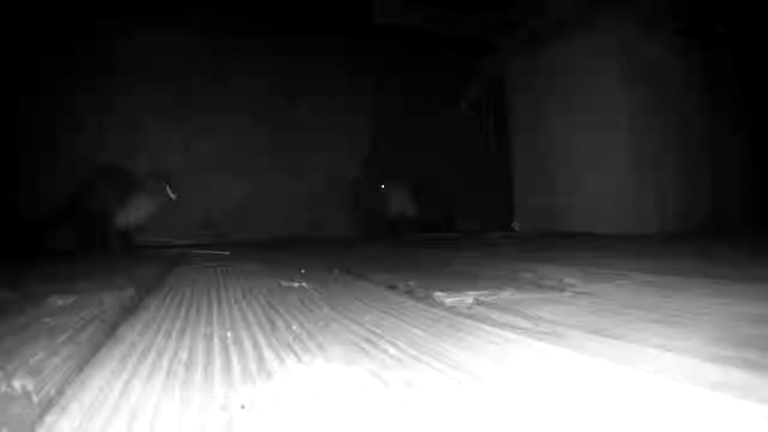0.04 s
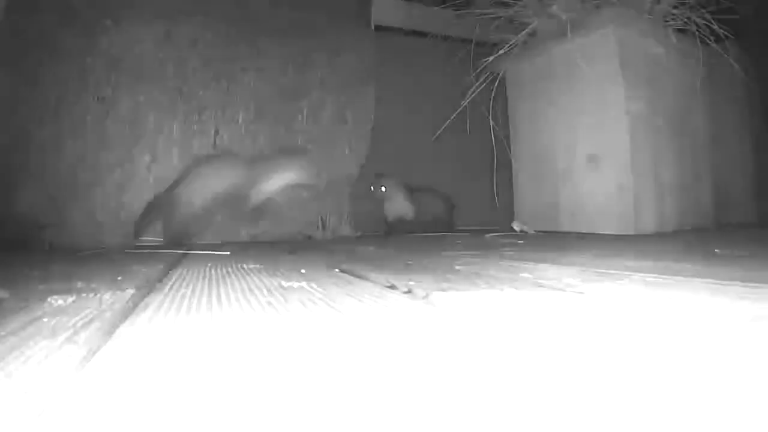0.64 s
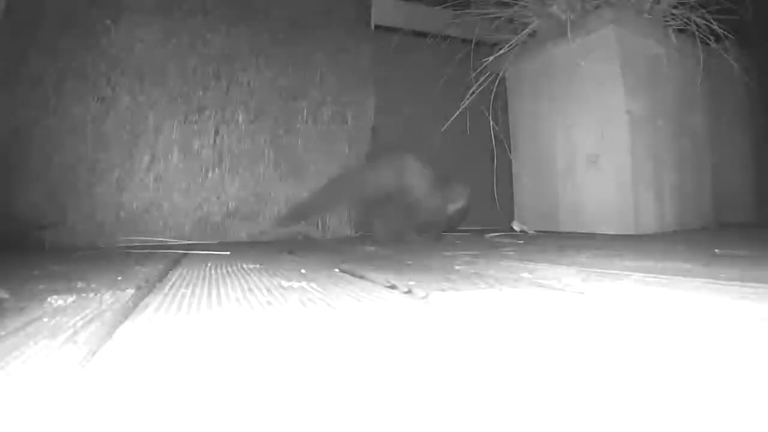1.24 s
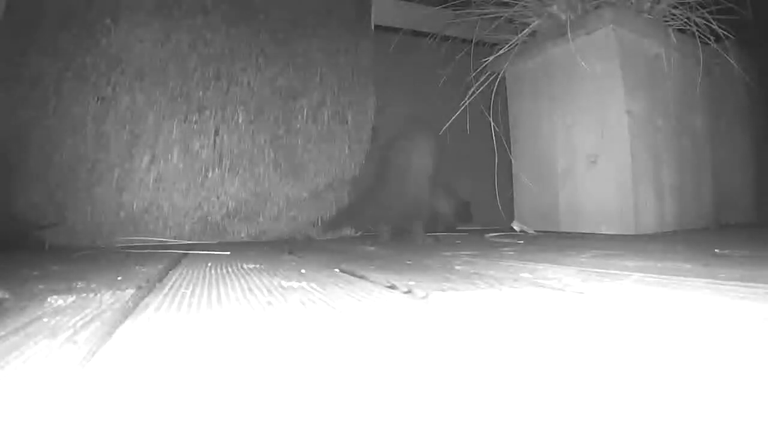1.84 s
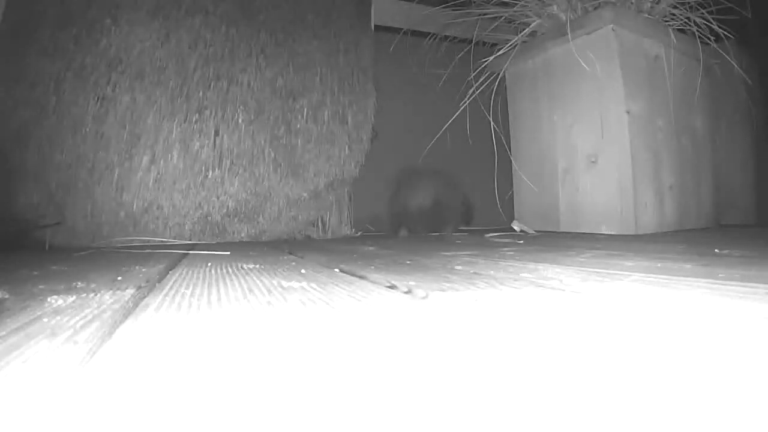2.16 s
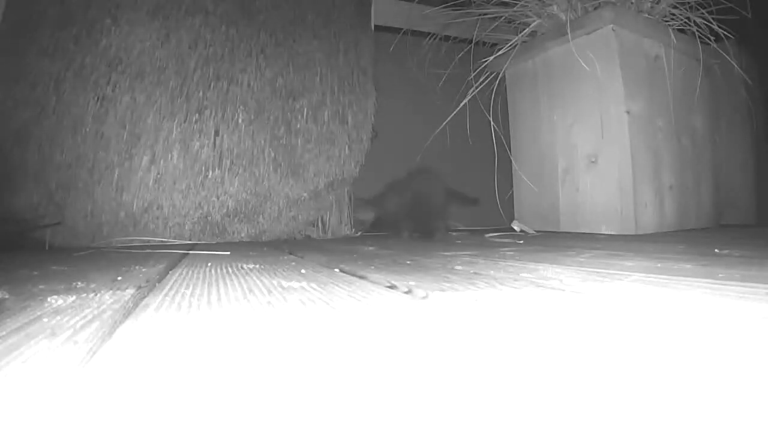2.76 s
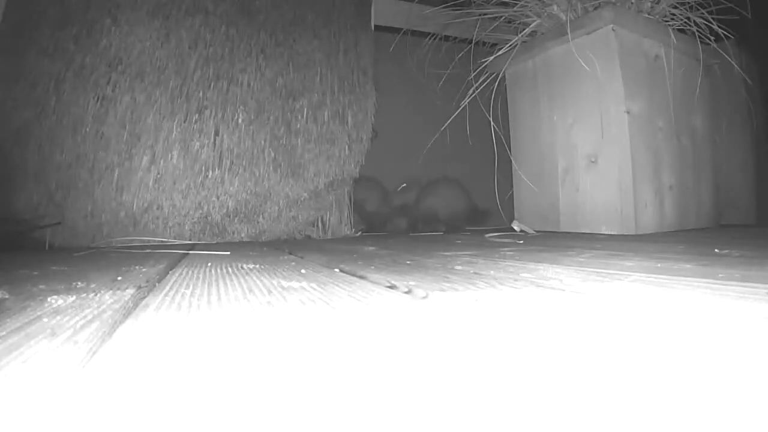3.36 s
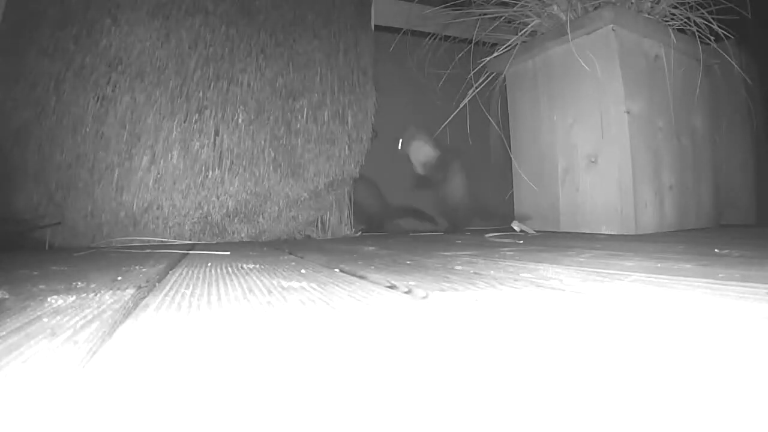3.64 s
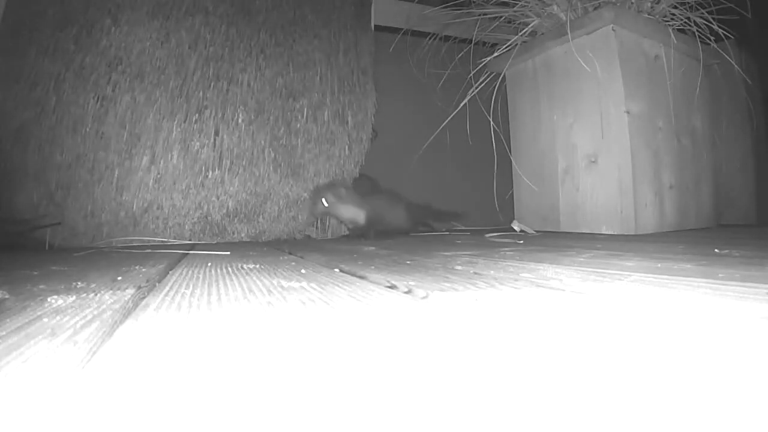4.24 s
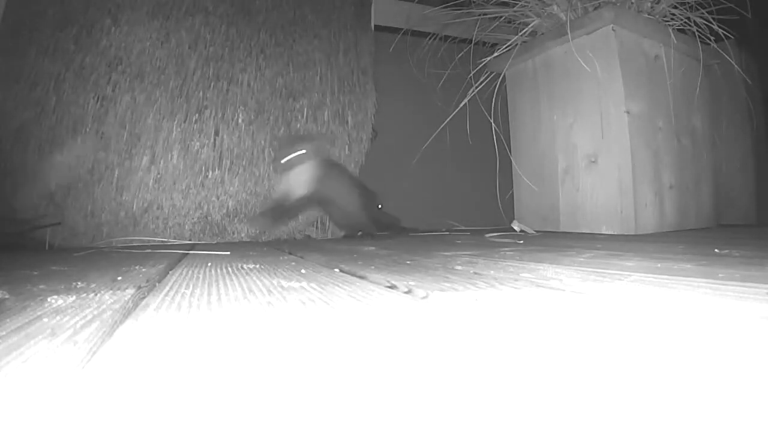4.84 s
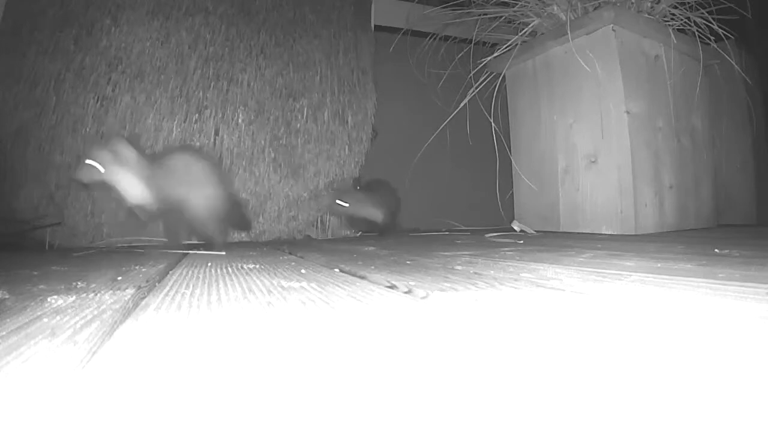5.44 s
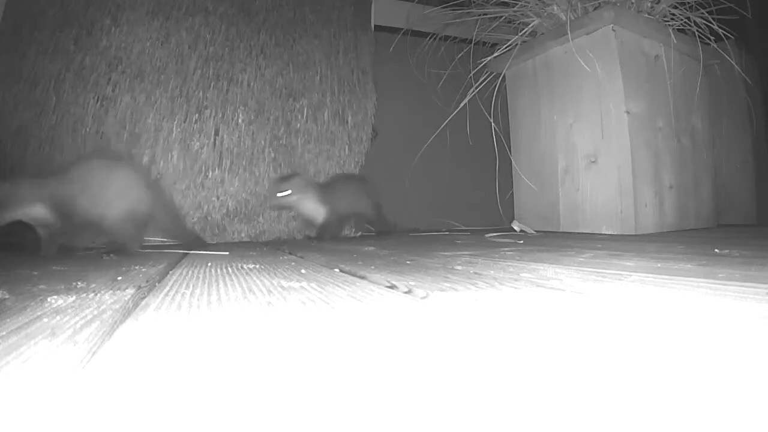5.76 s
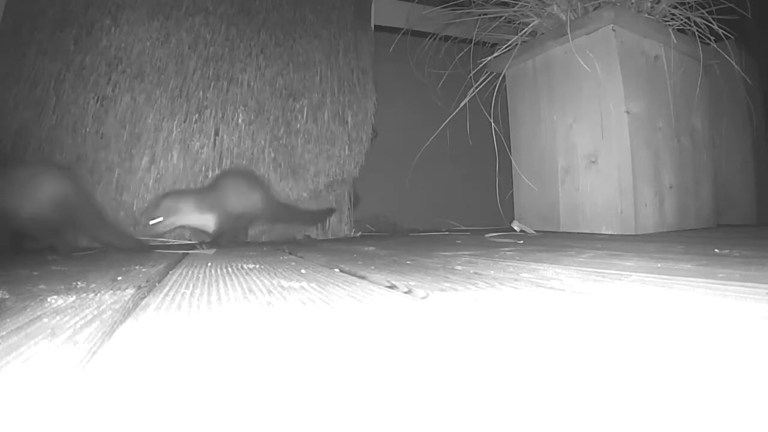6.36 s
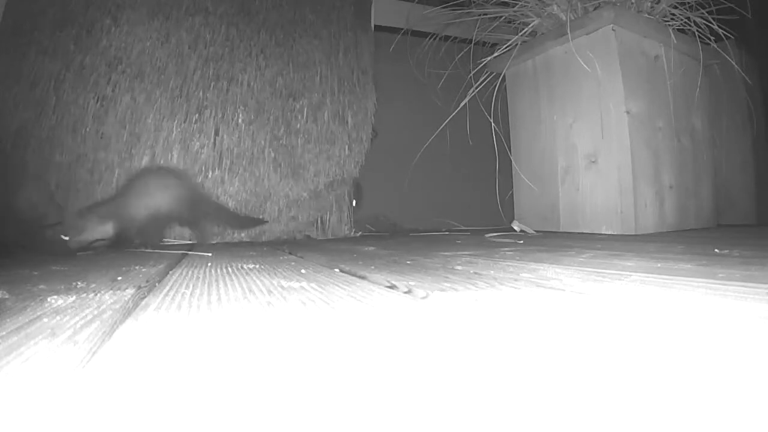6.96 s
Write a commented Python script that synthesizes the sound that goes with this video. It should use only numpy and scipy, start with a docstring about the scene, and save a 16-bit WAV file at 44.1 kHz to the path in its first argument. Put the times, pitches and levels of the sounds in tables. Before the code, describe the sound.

Small animals scamper and tussle on wooden floorboards in a shed, with irregular paw thuds, claw clicks and light rustling over faint hum and hiss.

```python
"""Inside a shed, a small camera standing on the plank floor. Its microphone wakes with a soft pop, on a
faint hum and hiss. At half a second a marten leaps in and bounds across: pads thud, heels knock, claws
click and scrape on the wood. From 2 s two martens tussle in the corner; fur and straw rustle between the
steps, and heavy landings set the joists swaying. From 5 s they run out past the camera, one by one."""
import sys
import numpy as np
from scipy import signal
from scipy.fft import rfft, irfft
from scipy.io import wavfile
from scipy.ndimage import uniform_filter1d

SR = 44100
rng = np.random.default_rng(int(sys.argv[2]) if len(sys.argv) > 2 else 0)


def dump(signal):
    """Clip the signal to [-1, 1] and save it as 16-bit WAV at the path in sys.argv[1]."""
    limited = np.clip(np.atleast_2d(signal).T, -1, 1)
    pcm = np.round(limited * 32767).astype(np.int16)
    wavfile.write(sys.argv[1], SR, pcm)


N = 317520
RING_TIME = np.arange(SR // 3) / SR  # time axis of one impact [s]

# steps with the body's weight on them; levels before the board and the spot hit shape them:
# (time [s], pad thud [dB], heel knock [dB], claw click [dB], slide [s], tone of the spot hit [Hz])
FOOTFALLS = [ (.559, -35, -27.5, -24, 0.00034, 420), (.594, -36, -36, -38.5, 0.00036, 790),
             (.649, -44.5, -33, -31.5, 0.0006, 1000), (.676, -48, -42, -48.5, 0.005, 817),
             (0.852, -44.5, -57, -68, 0.0036, 790), (.882, -52.5, -55.5, -58.5, 0.0008, 830),
             (1.049, -38.5, -42, -53.5, 0.0053, 790), (1.164, -51, -58, -68, 0.0033, 790),
             (1.201, -51.5, -58, -64, 0.0018, 750), (1.375, -45, -46.5, -58.5, 0.0024, 796),
             (1.446, -50, -50, -62, .001, 790), (1.828, -48, -56, -63, .0009, 800),
             (2.125, -39, -40, -50, .0019, 1172), (2.224, -39.5, -40, -55.5, 0.00081, 784),
             (2.38, -32, -47.5, -53.5, .0007, 680), (2.445, -53, -51, -55, 0.0011, 1160),
             (2.53, -49.5, -57, -62, .007, 790), (2.598, -60, -55, -64.5, 0.0017, 756),
             (2.685, -40, -58, -61, 0.0024, 990), (2.765, -39.5, -55.5, -58, 0.015, 830),
             (2.794, -44, -57.5, -46.5, 0.0013, 2190), (2.887, -57, -54, -54.5, 0.0015, 790),
             (2.942, -35.5, -58.5, -61.5, 0.0047, 790), (3.121, -42, -61, -64, 0.033, 2060),
             (3.163, -45.5, -59, -51.5, 0.0095, 3670), (3.319, -53.5, -58, -60, 0.0035, 1330),
             (3.48, -50, -58, -60, .02, 3460), (3.702, -49, -65.5, -68, 0.023, 2060),
             (3.769, -48, -67, -70, .016, 3500), (3.922, -44.5, -68, -56.5, 0.0043, 3440),
             (3.962, -44, -48.5, -60.5, 0.032, 836), (4.192, -40.5, -49, -49.5, 0.0032, 1045),
             (4.213, -45.5, -41.5, -56, .004, 755), (4.556, -51, -52.5, -52, 0.0031, 725),
             (4.786, -49, -52.5, -64, 0.0031, 620), (4.977, -51.5, -63.5, -64, 0.0039, 3400),
             (5.007, -51.5, -41.5, -38, 0.0012, 1890), (5.049, -49, -51.5, -44.5, 0.0014, 3600),
             (5.162, -50, -41, -41, .0021, 890), (5.242, -51, -49.5, -48.5, .002, 880),
             (5.292, -43, -44.5, -46.5, 0.001, 790), (5.335, -43.5, -45, -59, .0012, 790),
             (5.415, -37.5, -54.5, -50.5, 0.00061, 1990), (5.475, -48, -51, -49.5, 0.0016, 3200),
             (5.506, -40, -53.5, -48.5, 0.0058, 1560), (5.549, -49, -47.5, -50, 0.0021, 2210),
             (5.557, -58, -43.5, -44.5, 0.00034, 790), (5.607, -39.5, -47, -59.5, 0.013, 750),
             (5.661, -46.5, -50, -60, 0.0027, 790), (5.802, -43, -45.5, -52, .0009, 747),
             (5.833, -43, -55, -55.5, 0.0035, 790), (5.881, -46.5, -51.5, -55.5, 0.0038, 790),
             (6.037, -46.5, -47, -51, 0.002, 700), (6.329, -52.5, -59, -61.5, 0.0034, 854),
             (6.406, -52, -50.5, -48.5, 0.0024, 890), (6.436, -48.5, -74, -59, 0.0028, 850),
             (6.503, -55, -67, -52.5, 0.00058, 3280), (6.621, -53, -51.5, -69, 0.0076, 790),
             (7.071, -59.5, -50.5, -59, 0.0044, 990), (7.14, -64, -57.5, -62.5, 0.0078, 750)]
# claws raking the boards with no weight on them: (time [s], level [dB], slide [s])
SCRABBLES = [(.465, -56, 0.0015), (.748, -45, 0.00067), (.775, -49, 0.001), (.795, -50, .0046),
             (2.856, -49.5, 0.0048), (3.859, -49, 0.0078), (4.015, -55, 0.0039), (4.42, -57.5, 0.012),
             (4.878, -51.5, 0.0027), (5.228, -46, 0.0056), (5.45, -55, 0.003), (5.735, -58, 0.006),
             (6.544, -66.5, 0.014), (6.678, -52, 0.0028), (6.695, -56, .005), (6.946, -58, 0.0024),
             (6.975, -63, 0.014), (7.07, -46.5, 0.0022), (7.16, -62, .018)]
# boards along the animals' path; near a joist a plank bends less and clunks more:
# (time [s], stiffness [dB], plank pitch [Hz])
BOARDS_ON_PATH = [(.65, 2.5, 197.2), (.95, 5.5, 172.4), (2.2, -5, 194), (2.4, -6.5, 177.7), (3, 4.5, 181.9),
                  (3.7, 2, 184.4), (4.3, 6, 181.5), (5.35, 4, 188.4), (5.9, 8.5, 184.3), (6.6, 3, 184)]
# a plank bending under a pad: (multiple of its pitch [ratio], relative level [dB], base t60 [s])
PLANK_MODES = [(0.639, -12.5, 0.13), (0.799, -7.5, 0.16), (0.998, 2.5, 0.18), (1.131, -19.5, 0.57),
               (1.501, -23, 0.11)]
# higher modes of the floor: (frequency [Hz], relative level [dB], base t60 [s])
WOOD_MODES = [(362, -1, 0.042), (407.6, -4, 0.069), (525, -0.5, 0.074), (759.8, 3, 0.14), (799, -10, 0.26),
              (890, -0.5, 0.14), (1039, -5.5, 0.12), (1204.5, -4.5, 0.1), (1358, -1, 0.043),
              (1466, -17, 0.1), (1731, -6, 0.068), (2079, -0.5, 0.043), (2220, -2.5, 0.024),
              (2436, 0.5, 0.022), (2975, -3, 0.027), (3420, -19, 0.022)]
# decay of the floor's dense small modes, its grain: (frequency [Hz], t60 [s])
GRAIN_DECAY = [(200, 0.18), (900, .11), (1800, 0.039), (3500, 0.032)]
# that grain under a pad, a heel, a claw tip and a sliding claw: (frequency [Hz], relative level [dB])
PAD_SPECTRUM = [(150, -23.5), (310, 3), (430, 2), (560, -4.5), (750, -30)]
KNOCK_SPECTRUM = [(300, -27), (600, -17.5), (850, -5), (1300, -7.5), (1600, -36), (3000, -66.5)]
CLICK_SPECTRUM = [(700, -29.5), (1300, -4.5), (1900, 9), (2600, 6.5), (3600, 9), (4200, -41), (5300, -38)]
SCRATCH_SPECTRUM = [(1000, -17.5), (2000, -17), (3500, 5), (4300, 6), (5300, 0.5)]
# landings that shake the whole floor: (time [s], level [dB])
LANDINGS = [(0.647, -54), (1.061, -52), (2.125, -45), (2.764, -50.5), (3.582, -58), (4.012, -50.5),
            (4.22, -40.5), (5.1, -51), (5.452, -51), (5.841, -47.5), (6.079, -49), (6.448, -47),
            (7.119, -53)]
# how hard the bodies brush about: (time [s], relative level [dB])
BRUSHING = [(.55, -77), (.63, -58), (.92, -76.5), (1.62, -84), (2.101, -79.5), (2.35, -66.5), (2.6, -76),
            (2.98, -65), (3.251, -66), (3.95, -60.5), (4.3, -70), (4.852, -67), (5.35, -59), (5.8, -66.5),
            (5.979, -74.5), (6.498, -74.5), (6.95, -73.5), (7.19, -66.5)]
# fur and straw: (frequency [Hz], relative level [dB])
RUSTLE_SPECTRUM = [(200, -17), (500, 5), (1400, -1), (2100, 2), (3900, 4), (5300, 2.5)]
# the boards under light shuffling steps: (frequency [Hz], relative level [dB], t60 [s])
SHUFFLE_MODES = [(64.2, 0.5, .3), (146, 3, 0.068), (168, 1.5, 0.23), (204.8, 1, 0.34), (316.6, -6, 0.2),
                 (420, -10.5, 0.19), (790, -21.5, 0.07)]
# still air and the camera's electronics: (frequency [Hz], relative level [dB])
HISS_SPECTRUM = [(20, -13.5), (50, 11.5), (80, -8), (150, -6), (300, -10), (600, -13), (830, -10.5),
                 (1300, -15.5), (3000, -19), (5300, -22.5)]
# steady tones of the hum: (frequency [Hz], level [dB])
HUM_TONES = [(100, -72.5), (150.5, -82), (818, -78)]


def footfalls(pad_db=-10):
    """Paws on the floor the camera stands on: the pad thuds and puffs, the heel knocks, claws strike."""
    out = np.zeros(N)
    for time_s, thud_db, knock_db, click_db, slide_s, spot_hz in FOOTFALLS:
        grain = floor_grain(slide_s)
        stiff_db, plank_hz = board_at(time_s)
        add(out, time_s, amp(thud_db) * pad_thud(scattered(plank_hz, share=0.012), stiff_db, slide_s))
        puff_db = (thud_db + knock_db) / 2 + pad_db + stiff_db
        add(out, time_s, amp(puff_db) * crest(colour(grain, PAD_SPECTRUM)))
        add(out, time_s, heel_knock(grain, knock_db, stiff_db, spot_hz))
        scratch_db = scratch_balance(knock_db, click_db, slide_s)
        add(out, time_s, claw_strike(grain, click_db, scratch_db, slide_s, spot_hz))
    return out


def pad_thud(plank_hz, stiff_db, slide_s):
    """The soft pad bends the plank; a sliding paw loads it more slowly, a stiff board stops sooner."""
    modes = [(ratio * plank_hz, db, t60 * amp(-0.45 * stiff_db)) for ratio, db, t60 in PLANK_MODES]
    return amp(-0.15 * stiff_db) * crest(ring(modes, rise_s=0.0019 + 0.08 * slide_s, spread_db=6))


def heel_knock(grain, knock_db, stiff_db, spot_hz):
    """The heel rings the middle modes of the wood; a harder blow brings out those near 414 Hz."""
    modes = [(hz, db, t60 * amp(-0.3 * stiff_db - 0.5)) for hz, db, t60 in WOOD_MODES if hz < 1400]
    heel = crest(ring(modes, rise_s=0.0021, spread_db=5.5))
    heel += 0.66 * crest(colour(grain, KNOCK_SPECTRUM))
    heel = resonate(heel, 414, boost_db=0.6 * (knock_db + 19), q=8.9)
    heel = resonate(heel, spot_hz, boost_db=11.5, q=17.3)
    return amp(knock_db) * crest(heel)


def claw_strike(grain, click_db, scratch_db, slide_s, spot_hz):
    """The claws click on the high modes of the wood and scratch as they slide."""
    force = claw_force(slide_s)
    crack = 20 / (1 + slide_s / 0.0028) * (RING_TIME == 0)  # arrives ahead of the ringing
    modes = [(hz, db, t60) for hz, db, t60 in WOOD_MODES if hz >= 1400]
    tip = crest(ring(modes, rise_s=0.0061, spread_db=1.5))
    tip += 1.59 * crest(colour(grain + crack, CLICK_SPECTRUM))
    tip = resonate(tip, 1440, boost_db=0.5 * (click_db + 32), q=3)  # hard blows wake the stiffer modes
    tip = resonate(tip, spot_hz, boost_db=10, q=11)
    click = crest(signal.fftconvolve(tip, force))
    scratch = crest(signal.fftconvolve(colour(grain, SCRATCH_SPECTRUM), force))
    return amp(click_db) * (click + amp(scratch_db) * scratch)


def claw_force(slide_s, catches_per_s=1400):
    """A first contact, then tiny catches for as long as the claws slide."""
    t = RING_TIME[:SR // 12]
    force = impulses(len(t), catches_per_s) * (t / slide_s) * np.exp(1 - t / slide_s)
    force[0] = 3.1 / (1 + slide_s / 0.007)
    return force


def scratch_balance(knock_db, click_db, slide_s, usual_slide_s=0.0015, usual_click_db=-53):
    """Scratch against click [dB]: more in a long slide, less if claws hit hard or the pad lands flat."""
    doublings = np.log2(slide_s / usual_slide_s + 0.0016)
    hardness_db = max(click_db - usual_click_db, 0)
    softness_db = max(knock_db - click_db - 10, 0)
    return -6.5 + 2.9 * doublings - 0.3 * hardness_db - 0.6 * softness_db


def floor_grain(slide_s):
    """The dense small modes of the floor under one paw; a sliding paw lands softly."""
    rise_s = 0.00038 + 0.54 * slide_s
    return disperse(dying_noise(GRAIN_DECAY)) * (1 - np.exp(-RING_TIME / rise_s))


def disperse(x, lag_s=0.00465, fastest_hz=3800):
    """Low bending waves run slower, so a tap reaches the camera as a quick downward sweep."""
    hz = np.fft.rfftfreq(len(x), 1 / SR)
    delay_s = lag_s * np.maximum(np.sqrt(fastest_hz / (hz + 100)) - 1, 0)
    return irfft(rfft(x) * np.exp(-2j * np.pi * np.cumsum(delay_s) * hz[1]), len(x))


def board_at(time_s):
    """Stiffness [dB] and pitch [Hz] of the plank under the animals."""
    times, stiff_db, hz = np.transpose(BOARDS_ON_PATH)
    return np.interp(time_s, times, stiff_db), np.interp(time_s, times, hz)


def ring(modes, rise_s, spread_db, mistuning=0.0039):
    """Struck modes; the spot hit weights them, and slow bending waves make low ones swell later."""
    hz, db, t60 = np.transpose(modes)[:, :, None]
    t = RING_TIME[:int(np.clip(t60.max(), 0.1, 0.5) * SR)]
    weight = amp(db + spread_db * rng.standard_normal(hz.shape))
    swell = 1 - np.exp(-(t * hz / (rise_s * 1000)) ** 2)  # rise_s holds at 1 kHz
    detune = 1 + mistuning * rng.standard_normal(hz.shape)  # no two boards are quite alike
    waves = np.sin(2 * np.pi * (hz * detune * t + rng.random(hz.shape)))
    ringing = (weight * swell * amp(-60 * t / t60) * waves).sum(0)
    return np.pad(ringing, (0, len(RING_TIME) - len(t)))


def scrabbles(rake_hz=3420, drag_hz=2050, drag_from_s=0.012):
    """Claws rake the wood, bright and light, and hardly knock it; a long drag sounds lower."""
    out = np.zeros(N)
    for time_s, click_db, slide_s in SCRABBLES:
        grain = floor_grain(slide_s)
        stiff_db, _ = board_at(time_s)
        spot_hz = scattered(drag_hz if slide_s > drag_from_s else rake_hz, share=0.088)
        add(out, time_s, heel_knock(grain, click_db - 9, stiff_db, spot_hz))
        add(out, time_s, claw_strike(grain, click_db, scratch_db=-3, slide_s=slide_s, spot_hz=spot_hz))
    return out


def joists(sway_hz=42.9, t60_s=0.62, rise_s=0.041, step_db=-19):
    """The floor under the camera sways on its joists: a little at each step, more after a landing."""
    out, t = np.zeros(N), np.arange(SR) / SR
    envelope = crest((1 - np.exp(-(t / rise_s) ** 2)) * amp(-60 * t / t60_s))
    steps = [(time_s, thud_db + step_db) for time_s, thud_db, *_ in FOOTFALLS]
    for time_s, db in LANDINGS + steps:
        swing = np.sqrt(2) * np.sin(2 * np.pi * scattered(sway_hz, share=0.023) * t)
        add(out, time_s, amp(db) * envelope * swing)
    return out


def rustle(brush_db=3, shuffle_db=3.5):
    """Fur hisses and straw crackles in short strokes; light shuffling steps stir the boards with it."""
    effort = amp(np.interp(np.arange(N) / SR, *np.transpose(BRUSHING)))
    snap_sizes = amp(2.5 * np.minimum(rng.exponential(1, N), 4))
    snaps = snap_sizes * impulses(N, per_s=380)
    straw = unit(signal.oaconvolve(snaps, dying_noise([(100, 0.0056), (5000, 0.031)]))[:N])
    fur = rng.standard_normal(N)
    brush = unit(colour(fur + 1.36 * straw, RUSTLE_SPECTRUM))
    steps = impulses(N, per_s=45)
    shuffle = unit(signal.oaconvolve(steps, ring(SHUFFLE_MODES, rise_s=0.00087, spread_db=3))[:N])
    strokes_db = 2.16 * unit(uniform_filter1d(rng.standard_normal(N), size=SR // 30))
    return effort * (amp(brush_db + strokes_db) * brush + amp(shuffle_db) * shuffle)


def shed_echo(x, wet_db=-17, rise_s=0.017):
    """The wooden walls send a short, weak echo back to the microphone."""
    tail = dying_noise([(150, 0.41), (1000, 0.19), (4000, 0.32), (12000, 0.32)])
    tail *= 1 - np.exp(-(RING_TIME / rise_s) ** 2)
    return x + amp(wet_db) * signal.oaconvolve(x, tail / np.linalg.norm(tail))[:N]


def room_tone(hiss_db=-61.5):
    """Steady hiss of still air and electronics, with a faint hum."""
    t = np.arange(N) / SR
    hum = sum(amp(db) * unit(np.sin(2 * np.pi * (hz * t + rng.random()))) for hz, db in HUM_TONES)
    return amp(hiss_db) * unit(colour(rng.standard_normal(N), HISS_SPECTRUM)) + hum


def dying_noise(decay):
    """A noise burst whose bands die at their own speeds; decay is (frequency [Hz], t60 [s])."""
    hz, t, bands = signal.stft(rng.standard_normal(len(RING_TIME)), SR, nperseg=128)
    fade = amp(-60 * t / curve_at(decay, hz)[:, None])
    return signal.istft(bands * fade, SR)[1][:len(RING_TIME)]


def colour(x, spectrum):
    """Minimum-phase filter with the given spectrum, closed above its last point."""
    closed = [*spectrum, (spectrum[-1][0] * 1.3, -70)]
    log_gain = np.log(amp(curve_at(closed, abs(np.fft.fftfreq(4096, 1 / SR)))))
    taps = np.fft.ifft(np.exp(np.conj(signal.hilbert(log_gain)))).real
    return signal.oaconvolve(x, taps[:len(taps) // 2])[:len(x)]


def resonate(x, hz, boost_db, q):
    """Lifts the modes near one tone."""
    return x + amp(boost_db) * signal.lfilter(*signal.iirpeak(hz, q, SR), x)


def impulses(length, per_s):
    """Ticks of random size at random times."""
    return rng.standard_normal(length) * (rng.random(length) < per_s / SR)


def scattered(hz, share):
    """Varies a pitch: no two steps land on quite the same spot."""
    return hz * np.exp(share * np.clip(rng.standard_normal(), -2, 2))


def curve_at(points, hz):
    """Interpolates on a log-frequency axis."""
    point_hz, values = np.transpose(points)
    return np.interp(np.log(hz + 1), np.log(point_hz + 1), values)


def add(mix, time_s, sound):
    """Mixes a sound in at the given time."""
    part = mix[round(time_s * SR):][:len(sound)]
    part += sound[:len(part)]


def amp(db):
    """Decibels to gain."""
    return 10 ** (np.asarray(db) / 20)


def unit(x):
    """Scales to rms 1."""
    return x / np.sqrt(np.mean(x ** 2) + 1e-20)


def crest(x):
    """Scales so that the loudest hundredth of a second has rms 1."""
    return x / np.sqrt(uniform_filter1d(x ** 2, size=SR // 100, mode="constant").max() + 1e-20)


def scene():
    """The shed in mono, heard from floor level."""
    paws = shed_echo(footfalls() + scrabbles())
    return (paws + joists() + rustle() + room_tone())[None]


def record(dry, mic_on_s=0.4108, pop_db=-37.5, pop_s=0.034, top_hz=5258, edge_hz=15850, droop=0.13):
    """The camera's microphone wakes with a soft pop; coarse sampling adds a faint tink to each knock."""
    since_on = np.arange(N) / SR - mic_on_s
    pop = amp(pop_db) * np.exp(-abs(since_on) / pop_s)
    live = (since_on > 0) * (dry[0] - pop)
    quarter_rate = signal.oaconvolve(live, signal.firwin(301, top_hz, fs=SR), "same")[::4]
    # straight lines between the samples mirror the knocks into the treble
    joined = np.interp(np.arange(N), np.arange(0, N, 4), quarter_rate)
    dulled = signal.lfilter([1 - droop], [1, -droop], joined)
    steep_lowpass = signal.firwin(511, edge_hz, window=("kaiser", 9), fs=SR)
    return signal.oaconvolve(dulled, steep_lowpass, "same")[None]


dry = scene()
out = record(dry)
dump(out)
```